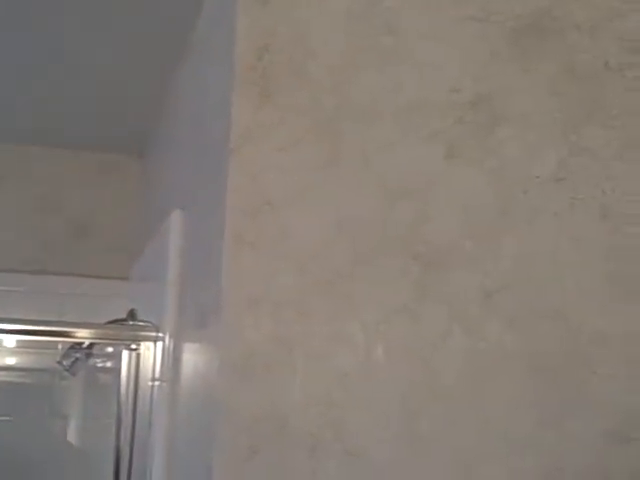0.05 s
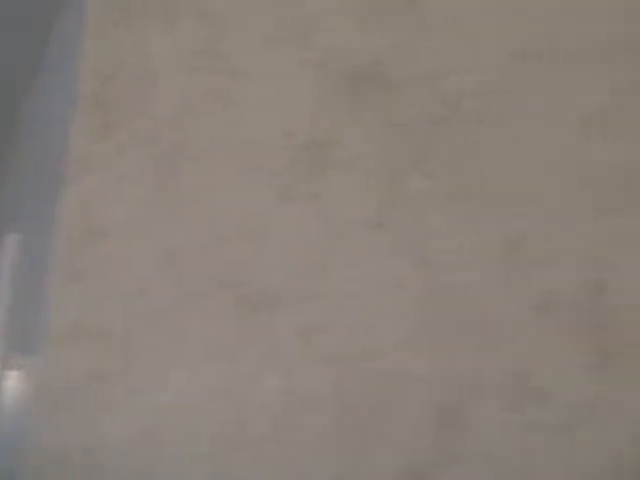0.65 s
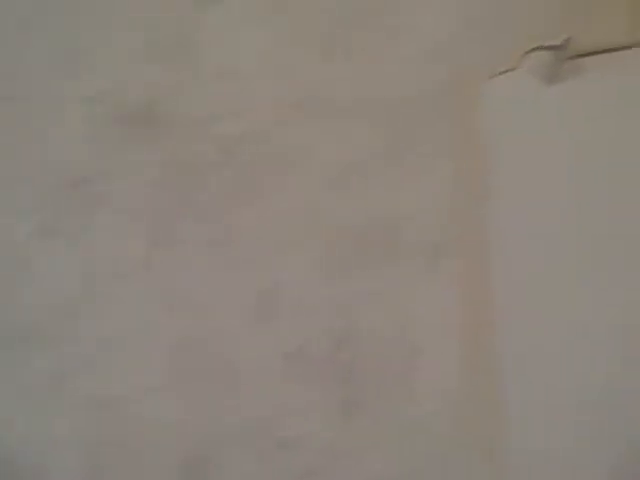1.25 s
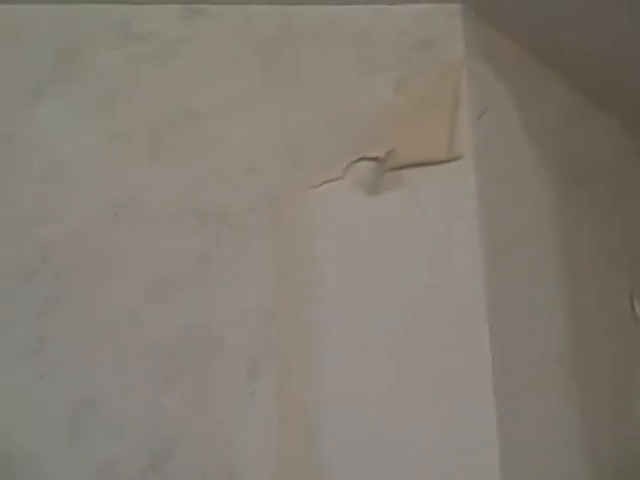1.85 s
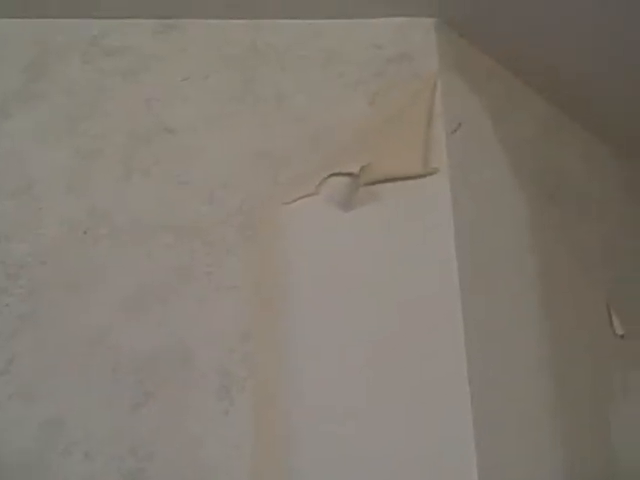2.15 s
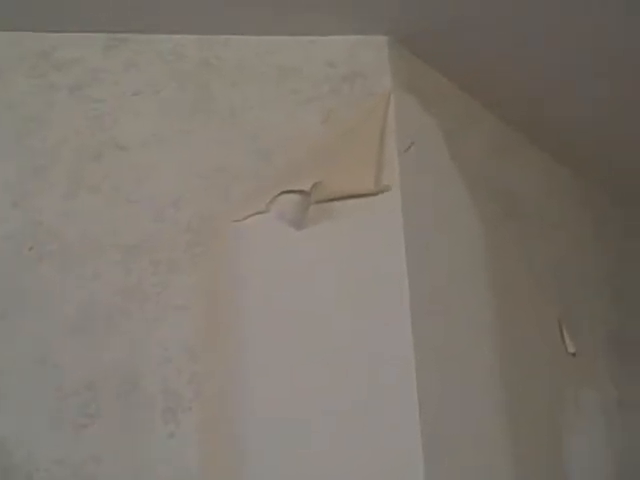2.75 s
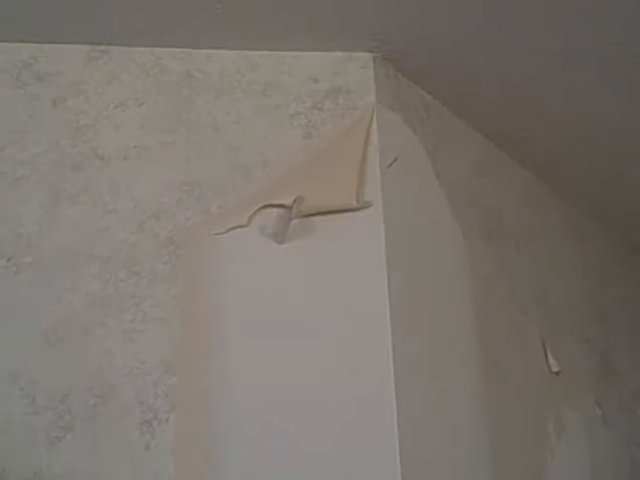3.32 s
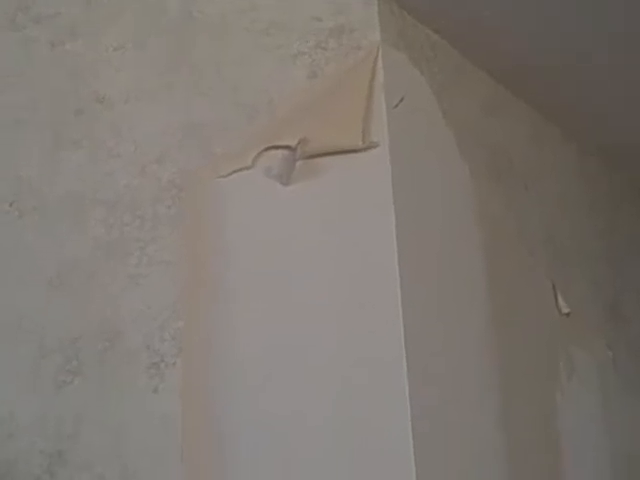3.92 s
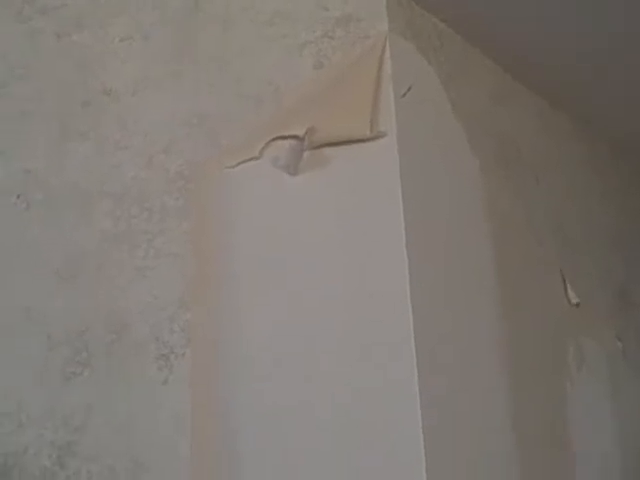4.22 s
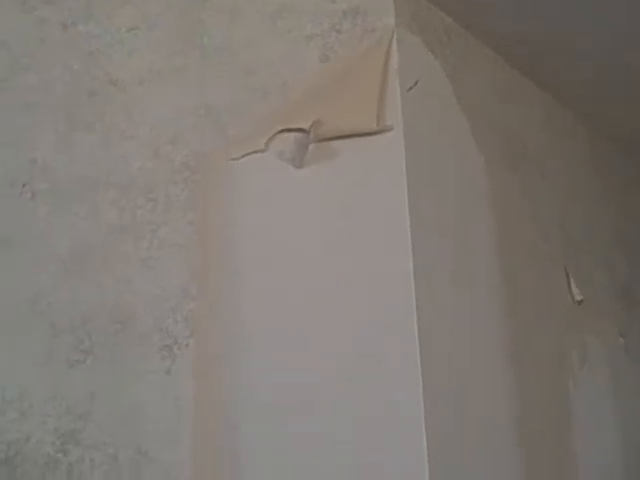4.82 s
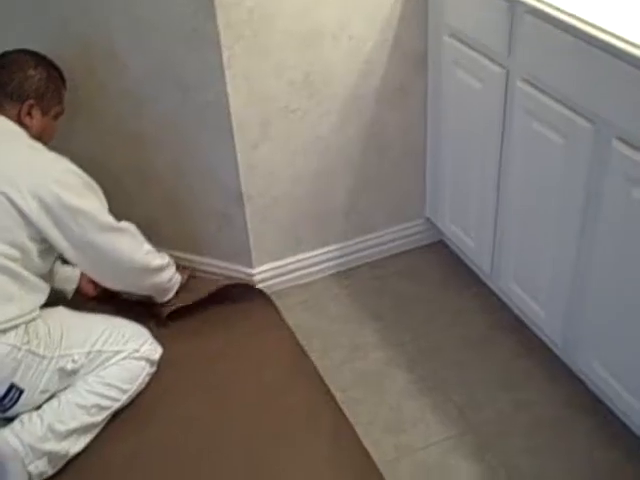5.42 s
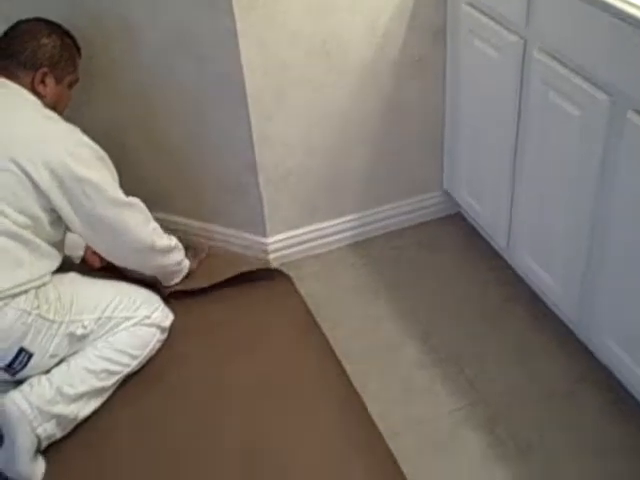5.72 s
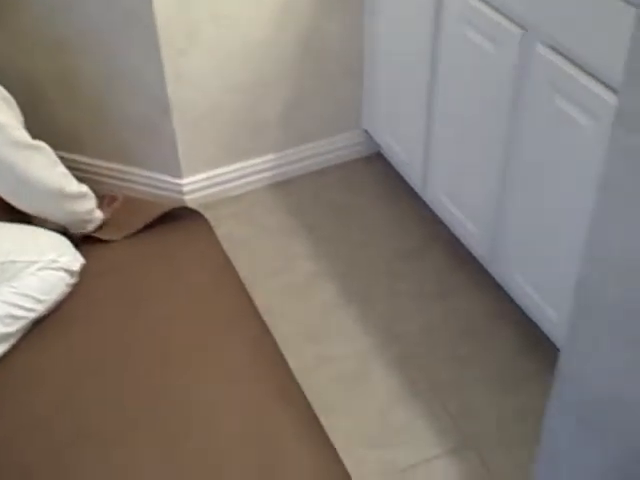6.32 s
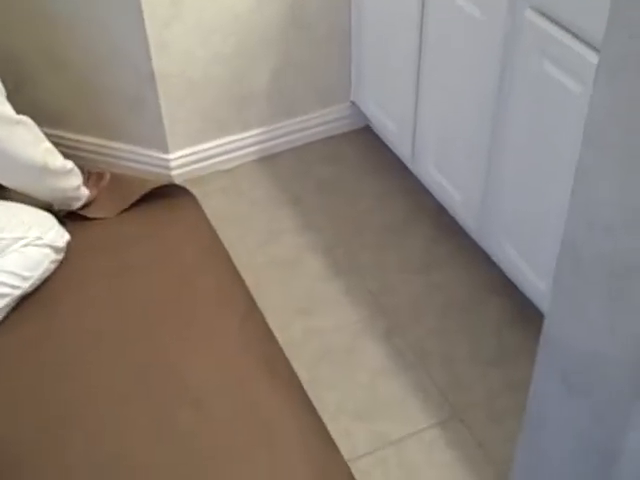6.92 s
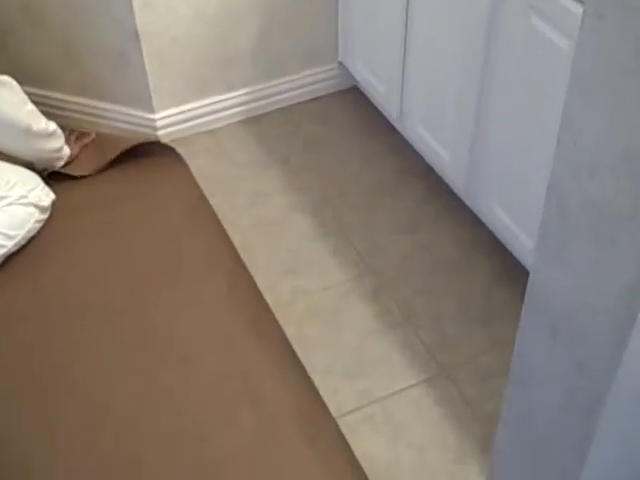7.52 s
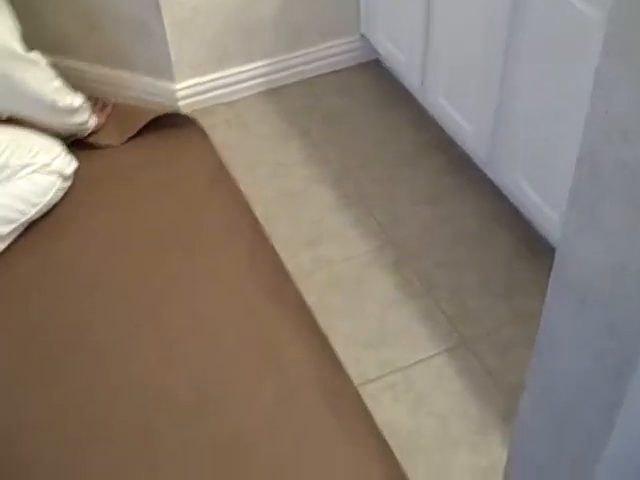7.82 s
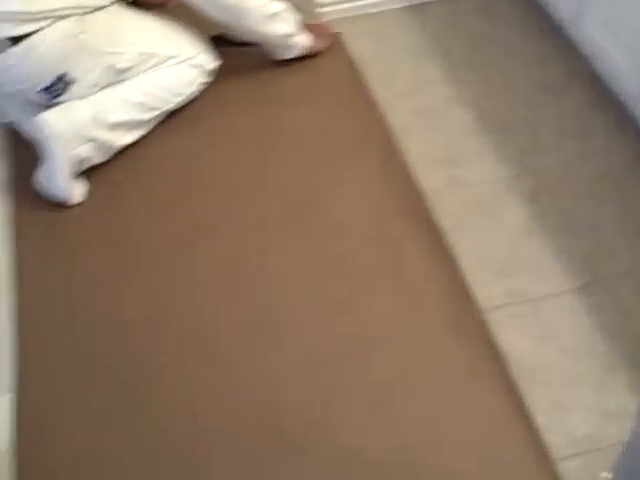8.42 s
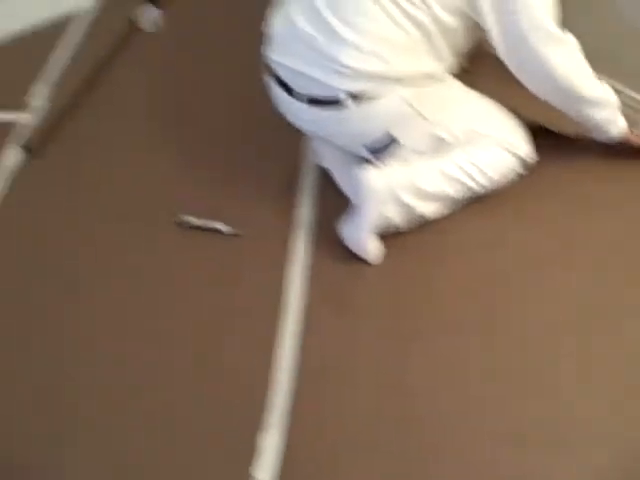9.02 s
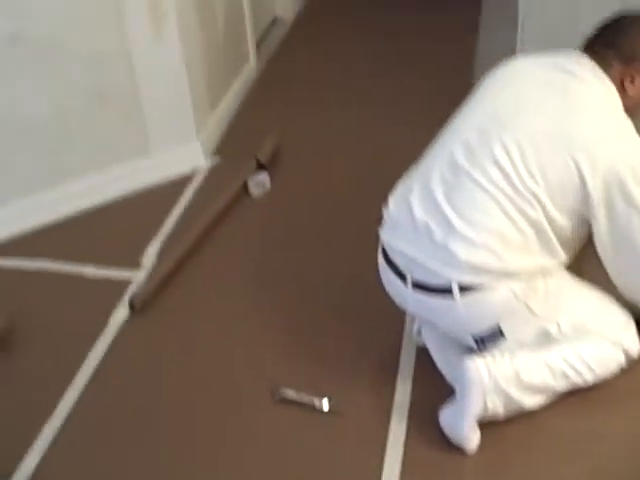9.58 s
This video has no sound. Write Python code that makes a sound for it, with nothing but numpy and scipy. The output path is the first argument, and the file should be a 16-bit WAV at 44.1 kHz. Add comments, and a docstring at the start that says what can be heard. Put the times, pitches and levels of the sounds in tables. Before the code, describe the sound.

In a bare room, a hand scraper pushes under wallpaper in uneven strokes. The blade hisses, rasps and clinks, the paper crackles loose and the wall knocks. About halfway, the sound cuts to a livelier room, where stiff covering paper is bent, snapped and smoothed over the floor by hand, louder, with a few more knocks. Occasional dry ticks sound close to the microphone over a faint rumble and hum.

```python
"""Decorating work in two bare rooms, each with a low rumble and hum, heard in mono.
First a scraper slides under wallpaper: the blade hisses, rasps and clinks, the paper crackles off
and the wall knocks. A few dry ticks sound close by.
Then, after about five seconds, stiff covering paper is bent, snapped and smoothed along the floor
by hand in a livelier room, with more knocks and ticks."""
import sys
import numpy as np
from scipy import signal
from scipy.fft import rfft, irfft
from scipy.io import wavfile
from scipy.ndimage import uniform_filter1d

SR = 44100
rng = np.random.default_rng(int(sys.argv[2]) if len(sys.argv) > 2 else 0)


def persist_wave(psi):
    """Save psi, clipped to +-1, as 16-bit WAV."""
    counts = np.round(np.clip(psi, -1, 1) * 32767).astype(np.int16)
    wavfile.write(sys.argv[1], SR, np.atleast_2d(counts).T)


N = 429975
T = np.arange(N) / SR

# the tone of a quiet house, mostly bass: pitch_hz, level_db
AIR_TONE = [(20, 1), (50, -0.5), (70, -2.5), (95, -2.5), (130, -4), (200, -10), (400, -12.5), (1000, -19.5),
            (3000, -22), (15500, -26)]


def undb(db):
    """Turn decibels into a number to multiply by."""
    return 10 ** (np.asarray(db) / 20)


def unit(x):
    """Scale a sound to an average (rms) level of 1."""
    return x / np.sqrt(np.mean(x ** 2))


def fade(t, ring_s):
    """A smooth fade that falls 60 dB in ring_s seconds."""
    return np.exp(-np.log(1000) * t / ring_s)


def add(out, start_s, sound, level_db):
    """Mix in a short sound, with its loudest 3 ms at level_db."""
    loudest = np.sqrt(uniform_filter1d(sound ** 2, size=132).max())
    first = int(start_s * SR)
    out[first:first + len(sound)] += (sound * undb(level_db) / loudest)[:N - first]


def colour(x, tone, tilt_db=0):
    """Filter a sound through (pitch_hz, level_db) points, brighter by tilt_db each octave."""
    size = 4096
    hz, db = np.transpose(tone)
    octave = np.log2(np.maximum(np.fft.rfftfreq(size, 1 / SR), 1))
    curve_db = np.interp(octave, np.log2(hz), db + tilt_db * np.log2(hz / hz[0]))
    cepstrum = irfft(np.log(undb(curve_db)))
    # make the filter ring only after a click, never before it
    cepstrum[1:size // 2] *= 2
    cepstrum[size // 2 + 1:] = 0
    return signal.fftconvolve(x, irfft(np.exp(rfft(cepstrum))))[:len(x)]


def wander(per_s):
    """A value that glides to a new random level per_s times a second."""
    step = int(SR / per_s)
    levels = np.repeat(rng.standard_normal(N // step + 1), step)
    return unit(uniform_filter1d(levels, step)[:N])


def slips(n, per_s, spread_db):
    """Surfaces stick and slip in tiny random clicks, most weak and a few strong."""
    strength = np.minimum(rng.exponential(size=n), 5)
    happens = rng.random(n) < per_s / SR
    return happens * rng.choice([-1, 1], n) * undb(spread_db * strength)


def room(ring_s, treble_ring_s, echo_db):
    """A room's answer to a click: the direct sound, then echoes that thicken into a fading tail."""
    t = T[:SR * 3 // 4]
    echoes = rng.standard_normal(len(t)) * (t > .002)
    density = np.clip(t / .03, .05, 1)
    echoes *= (rng.random(len(t)) < density) / np.sqrt(density)
    spectrum = rfft(echoes)
    octave = np.log2(np.maximum(np.fft.rfftfreq(len(t), 1 / SR), 1))
    bands = np.log2([1500, 3000, 6000, 12000])
    tail = 0
    for weights, band_ring_s in zip(np.eye(len(bands)), np.geomspace(ring_s, treble_ring_s, len(bands))):
        band = irfft(spectrum * np.interp(octave, bands, weights), len(t))
        tail = tail + band * fade(t, band_ring_s)
    response = tail * undb(echo_db) / np.linalg.norm(tail)
    response[0] += 1
    return response


def effort(strokes, sag_db_per_s, release_db_per_s):
    """One loudness curve per layer: each stroke swells, sags as the hand eases off, then dies away."""
    power = np.zeros((len(release_db_per_s), N))
    for start_s, rise_s, hold_s, *levels_db in strokes:
        first = int(start_s * SR)
        t = T[:min(SR, N - first)]
        swell = np.minimum(t / rise_s, 1) * undb(-sag_db_per_s * np.clip(t - rise_s, 0, hold_s))
        after_s = np.maximum(t - rise_s - hold_s, 0)
        for layer, level_db, release in zip(power, levels_db, release_db_per_s):
            layer[first:first + len(t)] += (swell * undb(level_db - release * after_s)) ** 2
    return np.sqrt(power)


def friction(space, tone, per_s, spread_db, shake_db, shake_per_s):
    """A stream of slips, louder and softer as the hand shakes; the echoes change as it travels."""
    clicks = slips(N, per_s, spread_db) * undb(shake_db * wander(shake_per_s))
    clicks = colour(clicks, tone)
    spots, place = 4, T / .035  # blend into the next spot's echoes every 35 ms
    heard = 0
    for spot in range(spots):
        nearness = np.maximum(1 - abs((place - spot + 1) % spots - 1), 0)
        heard = heard + signal.oaconvolve(clicks * np.sqrt(nearness), room(**space))[:N]
    return unit(heard)


def cracks(events, tone, space, per_s, spread_db):
    """Each crack is a quick, dying burst of slips that rings on in the room."""
    out, t = np.zeros(N), T[:SR // 4]
    for start_s, level_db, fade_s, tilt_db in events:
        burst = slips(len(t), per_s, spread_db) * np.exp(-t / fade_s)
        burst = colour(burst, tone, tilt_db)
        add(out, start_s, signal.fftconvolve(burst, room(**space)), level_db)
    return out


def wall_scraping():
    """The blade slides on plaster, the wallpaper crackles loose and the wall rumbles under the push."""
    # pushes of the scraper: start_s, rise_s, hold_s, hiss_db, crackle_db, rumble_db
    pushes = [(0.0, 0.0037, 0.022, -49.5, -45.5, -56), (0.114, 0.072, 0.147, -54, -71, -61.5),
              (0.223, 0.23, 0.11, -43.0, -46.5, -60), (0.548, 0.13, 0.16, -53, -61, -67.5),
              (0.797, 0.091, 0.096, -56, -57.5, -68), (0.988, 0.037, 0.15, -63.0, -72.5, -76),
              (1.312, 0.011, 0.111, -57, -54, -60), (1.463, 0.009, 0.025, -49.5, -49, -53.5),
              (1.578, 0.066, 0.27, -61, -68, -57.5), (1.66, 0.078, 0.052, -47.5, -56, -58.0),
              (1.815, 0.087, 0.017, -48.5, -53.5, -59), (1.938, 0.092, 0.109, -50, -67, -65.0),
              (2.058, 0.18, 0.2, -45.5, -50.5, -60), (2.559, 0.066, 0.031, -45.5, -51.5, -63.5),
              (2.754, 0.035, 0.022, -56, -63.5, -50.5), (2.777, 0.086, 0.014, -46, -56, -59),
              (2.923, 0.045, 0.035, -42, -51, -59.5), (3.156, 0.14, 0.098, -46, -53.5, -58),
              (3.348, 0.025, 0.06, -38.5, -42.5, -50.5), (3.449, 0.031, 0.024, -41, -48, -53.0),
              (3.755, 0.036, 0.12, -50.5, -49, -50.5), (3.927, 0.026, 0.29, -51, -48, -52.5),
              (4.222, 0.086, 0.058, -60, -49, -51.5), (4.505, 0.02, 0.08, -56.5, -63.0, -55),
              (4.549, 0.056, 0.11, -45.5, -61, -61), (4.641, 0.027, 0.009, -48.5, -43, -60),
              (4.824, 0.088, 0.068, -67, -56, -57.5), (5.211, 0.013, 0.024, -61.5, -57, -74.0)]
    # the blade catches and a strip lets go: start_s, level_db, fade_s, tilt_db_per_octave
    catches = [(0.005, -46, 0.045, -6.5), (0.88, -47, 0.0071, 9), (1.3215, -40, 0.011, 0),
               (1.407, -44.5, 0.0061, -3), (1.4755, -35, 0.0089, -3), (1.990, -58, 0.0067, 9),
               (2.5816, -45, .02, 12), (2.769, -59, 0.011, -10), (2.8889, -34, .004, 12),
               (2.9328, -40, 0.022, 2.5), (3.2327, -47.5, 0.017, -5.5), (3.3605, -31, 0.0043, 9),
               (3.4931, -32.5, 0.005, 2), (3.7714, -47.5, 0.013, -2.5), (3.963, -39.5, 0.0065, 0),
               (4.056, -40, 0.0056, -3.5), (4.2773, -37.5, 0.0037, -1.5), (4.353, -44, 0.0031, -1.5),
               (4.5237, -42, .003, 11), (4.5956, -38, 0.018, 5), (5.2245, -46, 0.0082, -1.5)]
    # tones of the blade, wallpaper, wall and loosened strip: pitch_hz, level_db
    blade_tone = [(400, -21), (1500, -13), (3000, 1), (4500, -1.5), (6000, -0.5), (8000, -1.5),
                  (11000, -0.5), (15500, -3)]
    paper_tone = [(300, -16.5), (700, -1.5), (1000, -1.5), (1300, 3), (1600, 2), (2000, -0.5), (3000, -2),
                  (4500, -3.5), (8000, -9.5), (15500, -18)]
    wall_tone = [(100, -9.5), (210, -6), (300, 5), (370, 2), (460, -1.5), (600, 2.5), (800, -2.5),
                 (1300, -6.5), (4000, -39)]
    strip_tone = [(200, -23.5), (600, -2), (950, -12), (1180, 6.5), (1500, -16), (1900, 4.5), (2400, 1.5),
                  (3200, 2.5), (6000, 2.5), (10000, 0), (15500, -2)]
    space = dict(ring_s=0.62, treble_ring_s=0.41, echo_db=1)
    slide, peel, press = effort(pushes, sag_db_per_s=11.5, release_db_per_s=(138, 62, 62))
    hiss = friction(space, blade_tone, per_s=12000, spread_db=2, shake_db=0.9, shake_per_s=70)
    crackle = friction(space, paper_tone, per_s=2500, spread_db=2, shake_db=1.5, shake_per_s=50)
    rumble = friction(space, wall_tone, per_s=700, spread_db=1.5, shake_db=0.5, shake_per_s=42)
    rips = cracks(catches, strip_tone, space, per_s=12000, spread_db=4)
    return slide * hiss + peel * crackle + press * rumble + rips


def still_air(air_db, hum_db):
    """The house rumbles softly, with a low, wavering hum."""
    hum = np.sin(2 * np.pi * 69.4 * T + 1.3 * wander(2.9)) * undb(4.4 * wander(2.6))
    rumble = colour(rng.standard_normal(N), AIR_TONE)
    return undb(air_db) * unit(rumble) + undb(hum_db) * unit(hum)


def blade_rasps():
    """Slips make the pressed blade chatter at one pitch, in a rasp that swells and fades."""
    # rasps in mid-stroke: peak_s, half_length_s, pitch_hz, width_hz, level_db
    rasps = [(0.51, 0.14, 3150, 264.6, -51), (3.416, 0.051, 2540, 300, -44), (4.67, 0.1, 1300, 160, -51.5),
             (4.682, 0.077, 3850, 300, -52)]
    out, t = np.zeros(N), T[:SR // 2]
    for peak_s, half_length_s, pitch_hz, width_hz, level_db in rasps:
        ring = np.sin(2 * np.pi * pitch_hz * t) * np.exp(-np.pi * width_hz * t)
        chatter = signal.oaconvolve(slips(N, per_s=4000, spread_db=3.5), ring)[:N]
        swell = np.exp(-((T - peak_s) / half_length_s) ** 2)
        out += unit(chatter) * undb(level_db) * swell
    return out


def blade_clinks():
    """The steel blade hits the wall and rings; where it is struck decides which notes stand out."""
    # hits of the blade: start_s, level_db, favoured_pitch_hz
    hits = [(1.3225, -61, 4000), (1.477, -48, 2000), (4.2775, -39.5, 4400)]
    # the blade's own notes: pitch_hz, level_db, ring_s
    blade_notes = [(1250, -11, 0.27), (1880, -4, 0.36), (2270, -16, 0.35), (3160, -8, .2), (3670, 7, 0.071),
                   (5490, 1, 0.082), (6842, -12, .18)]
    out, t = np.zeros(N), T[:SR // 2]
    for start_s, level_db, favoured_hz in hits:
        ring = 0
        for pitch_hz, note_db, ring_s in blade_notes:
            octaves_away = abs(np.log2(pitch_hz / favoured_hz))
            ring += undb(note_db - 10 * octaves_away) * np.sin(2 * np.pi * pitch_hz * t) * fade(t, ring_s)
        echoes = room(ring_s=0.1, treble_ring_s=0.13, echo_db=-8)
        add(out, start_s, signal.fftconvolve(ring, echoes), level_db)
    return out


def knocks():
    """Blows ring the boards; longer contact sounds duller, and a resting hand shortens the ring."""
    # blows on the wall and floor: start_s, level_db, contact_s, ring_multiplier
    blows = [(1.477, -50, 0.00089, 3.9), (2.768, -44, 0.0005, 2), (3.359, -40.5, 0.00066, 0.65),
             (3.495, -43, 0.0018, 0.73), (3.607, -35.5, 0.0011, 0.054), (3.781, -44.5, 0.0009, 1.3),
             (4.111, -43, 0.0025, 1.4), (4.278, -41.5, 0.0059, 0.96), (4.345, -44, 0.0056, 2.3),
             (5.939, -59, 0.0017, 1), (6.352, -42, 0.0062, 1.3), (6.392, -36, 0.0048, 2.2),
             (6.501, -37.5, 0.0022, 2.2), (6.59, -42, 0.0022, 1.3), (7.598, -42.5, 0.0012, 1.7),
             (8.41, -43, 0.0015, 2.7), (8.691, -47.5, 0.0024, 1.9)]
    # the boards' own notes: pitch_hz, level_db, ring_s (before the multiplier)
    board_notes = [(114, -3.5, 0.18), (177.6, 1, 0.13), (217, -4, 0.29), (271, 6, 0.13), (303.3, 13, 0.11),
                   (369, 4, 0.21), (420, -22, .12), (556, -5, 0.115), (634, 5.5, 0.11), (777, 5.5, 0.11),
                   (1205, 3, 0.086)]
    out, t = np.zeros(N), T[:SR // 2]
    for start_s, level_db, contact_s, ring_multiplier in blows:
        detune = 1 + 0.04 * rng.standard_normal(len(board_notes))
        ring = 0
        for k, (pitch_hz, note_db, ring_s) in enumerate(board_notes):
            note = (-1) ** k * np.sin(2 * np.pi * pitch_hz * detune[k] * t)
            ring += undb(note_db) * note * fade(t, ring_s * ring_multiplier)
        push = np.hanning(int(contact_s * SR) + 2)
        add(out, start_s, np.convolve(ring, push), level_db)
    return out


def ticks():
    """Bright, very short clicks, so close that they have little echo."""
    # small dry ticks: start_s, level_db
    clicks = [(2.003, -37), (2.0658, -41), (3.6807, -40), (6.0975, -38), (6.624, -39), (7.2176, -27)]
    # their tone: pitch_hz, level_db
    tick_tone = [(500, -29), (3000, -3), (6000, -3), (8500, 3), (11000, -3), (14000, 3)]
    out, t = np.zeros(N), T[:SR // 4]
    for start_s, level_db in clicks:
        click = colour(rng.standard_normal(len(t)) * np.exp(-t / 0.0018), tick_tone)
        echoes = room(ring_s=0.23, treble_ring_s=0.14, echo_db=-13)
        add(out, start_s, signal.fftconvolve(click, echoes), level_db)
    return out


def floor_paper():
    """Palms slide over the sheet; it crackles as it bends, flaps on the floor and buckles with a snap."""
    # sweeps and bends of the paper: start_s, rise_s, hold_s, hiss_db, crackle_db, flap_db
    sweeps = [(5.278, 0.011, 0.12, -38, -34, -34.5), (5.424, 0.069, 0.033, -40.5, -31.0, -36.5),
              (5.686, 0.07, 0.093, -45, -45, -49), (5.94, 0.015, 0.02, -52, -38, -40),
              (6.039, 0.018, 0.095, -45, -32, -46.5), (6.166, 0.068, 0.076, -46.5, -48, -47),
              (6.32, 0.069, 0.018, -34, -32, -33), (6.412, 0.044, 0.1, -59, -39, -38),
              (6.864, 0.0091, 0.074, -48, -46, -50.5), (6.895, 0.12, 0.028, -38.5, -33.5, -39.5),
              (7.177, 0.036, 0.18, -47.5, -46, -64), (7.309, 0.058, 0.098, -51.5, -42, -54.5),
              (7.427, 0.14, 0.066, -46.5, -54, -62), (7.556, 0.077, 0.126, -40.5, -45, -43.0),
              (7.642, 0.029, 0.009, -54, -36.5, -44), (7.77, 0.009, 0.011, -57.0, -37.5, -50),
              (7.904, 0.2, 0.055, -31.5, -38, -60.5), (8.14, 0.099, 0.15, -36.5, -52, -72),
              (8.331, 0.061, 0.11, -28, -40.5, -47), (8.692, 0.032, 0.047, -42.5, -55, -55.5),
              (8.766, 0.089, 0.006, -33.5, -41.5, -59), (9.046, 0.075, 0.067, -47.5, -54.0, -60),
              (9.157, 0.1, 0.027, -33.5, -43.5, -54), (9.264, 0.04, 0.078, -35, -34.5, -49.0),
              (9.46, 0.22, 0.1, -33.5, -39.5, -50)]
    # the stiff sheet buckles: start_s, level_db, fade_s, tilt_db_per_octave
    buckles = [(5.2864, -22, 0.0024, 1), (5.299, -28, 0.0098, 0.5), (5.428, -29.5, 0.0067, 11.5),
               (5.4416, -23, 0.0035, -2.5), (5.7603, -27.5, 0.0022, 6.5), (5.9524, -28, 0.0018, 7),
               (6.0452, -18, 0.0033, 3.5), (6.0525, -20, 0.0092, 0.5), (6.2866, -30.5, 0.0033, 9),
               (6.3425, -31.5, 0.0035, 13), (6.360, -28.5, 0.0034, 15), (6.3799, -27.5, 0.039, 5),
               (6.8718, -39, 0.0055, 11.5), (6.9077, -29, 0.0081, -4), (6.998, -26, 0.0017, -2),
               (7.3378, -30.5, 0.0042, 2), (7.6046, -32.5, 0.016, 2), (7.6595, -28, 0.018, -4),
               (7.779, -25.5, 0.0069, -4.5), (7.7872, -24, 0.0016, 3.5), (8.0292, -35, .01, -2),
               (8.6897, -31, 0.0097, 4.5), (8.7994, -33, 0.011, 14.5), (9.63, -32, 0.013, 5)]
    # tones of the palms and of the sheet bending, flapping and snapping: pitch_hz, level_db
    palm_tone = [(400, -17), (1500, -16), (3000, -0.5), (4200, 1), (6000, 1), (8000, 0), (11000, -0.5),
                 (15500, -3)]
    bend_tone = [(300, -14), (650, -7), (850, -5), (1100, -1), (1600, 2.5), (2200, 1.5), (3100, -4.5),
                 (4500, -9.5), (7000, -17), (15500, -34)]
    flap_tone = [(60, -36), (110, -15.5), (170, -10), (260, -10), (380, -4), (480, -2.5), (680, 2.5),
                 (850, 1.5), (1300, -1.5), (4000, -55)]
    snap_tone = [(90, -45), (200, -27), (400, -13), (620, -13), (800, -7), (1200, 0.5), (1700, 0),
                 (3000, -1), (4500, -8.5), (7000, -16.5), (11000, -31.5), (15500, -39)]
    # hard walls and tiles make the echoes stronger than the direct sound
    rub_room = dict(ring_s=0.7, treble_ring_s=0.42, echo_db=2)
    snap_room = dict(ring_s=0.76, treble_ring_s=0.4, echo_db=0.5)
    slide, bend, flap = effort(sweeps, sag_db_per_s=15, release_db_per_s=(85, 63.3, 62.5))
    hiss = friction(rub_room, palm_tone, per_s=22000, spread_db=1.8, shake_db=0.4, shake_per_s=90)
    crackle = friction(rub_room, bend_tone, per_s=1800, spread_db=2, shake_db=3, shake_per_s=45)
    flapping = friction(rub_room, flap_tone, per_s=700, spread_db=2, shake_db=1, shake_per_s=27)
    snaps = cracks(buckles, snap_tone, snap_room, per_s=20000, spread_db=2.3)
    return slide * hiss + bend * crackle + flap * flapping + snaps


def scene():
    """One room after the other, with a moment of near silence between; both channels alike."""
    wall_end_s, floor_start_s = 5.254, 5.285
    first_room = wall_scraping() + blade_rasps() + blade_clinks() + still_air(air_db=-59.5, hum_db=-66.5)
    second_room = floor_paper() + still_air(air_db=-56.5, hum_db=-64.5)
    rooms = first_room * (T < wall_end_s) + second_room * (T > floor_start_s)
    faint_noise = undb(-77) * unit(colour(rng.standard_normal(N), AIR_TONE))
    mono = rooms + knocks() + ticks() + faint_noise
    return np.array([mono, mono])


def record(dry):
    """A steep filter cuts off the highest treble."""
    top_hz = 15850
    return signal.sosfilt(signal.ellip(10, .2, 80, top_hz, fs=SR, output="sos"), dry)


dry = scene()
out = record(dry)
persist_wave(out)
```